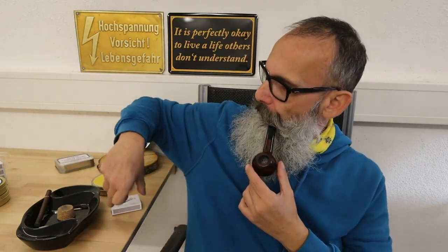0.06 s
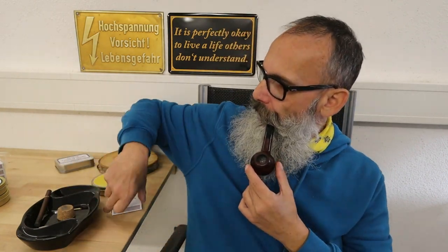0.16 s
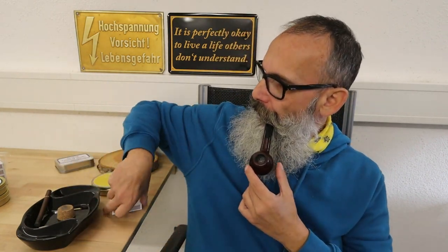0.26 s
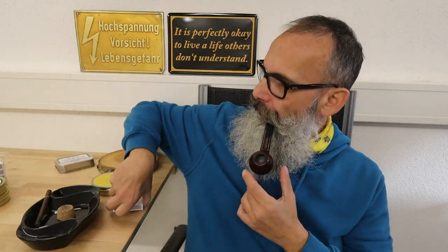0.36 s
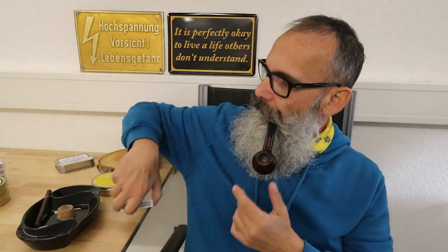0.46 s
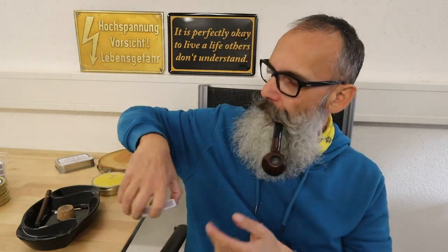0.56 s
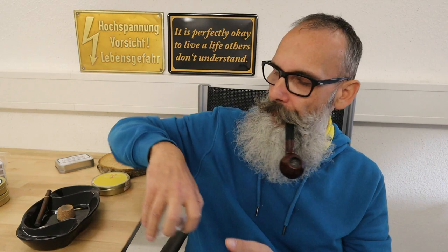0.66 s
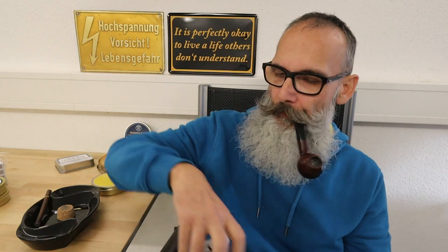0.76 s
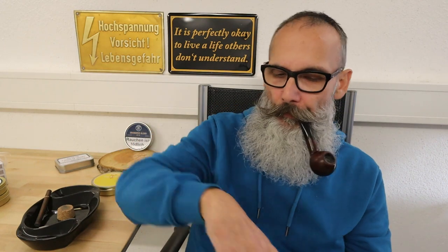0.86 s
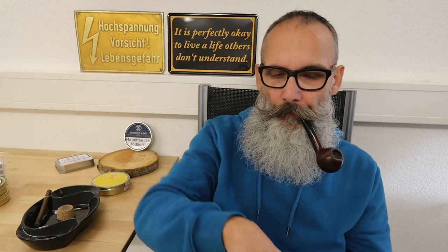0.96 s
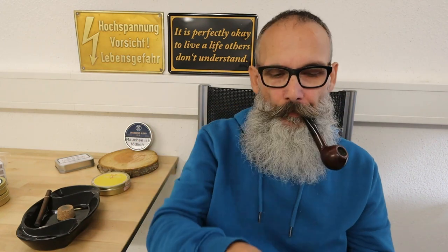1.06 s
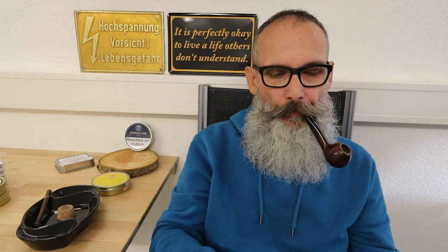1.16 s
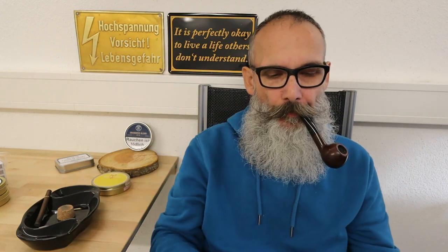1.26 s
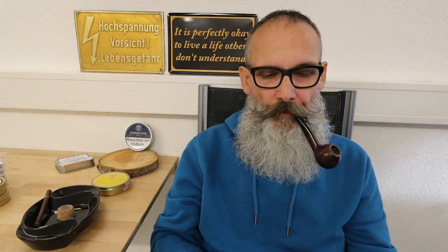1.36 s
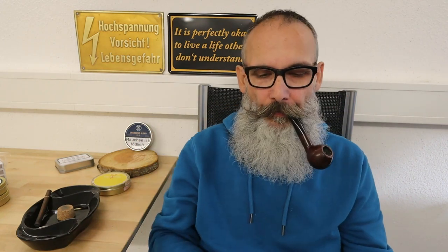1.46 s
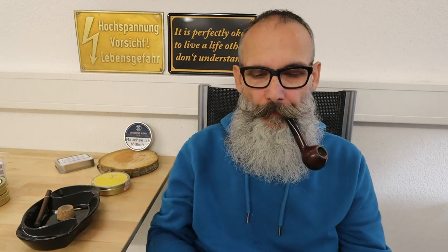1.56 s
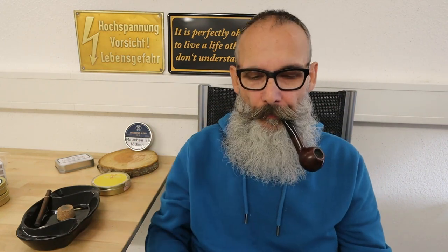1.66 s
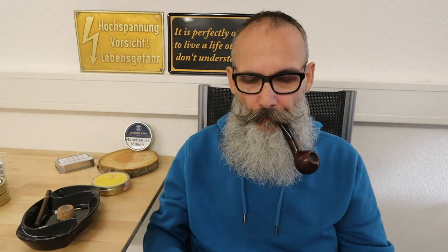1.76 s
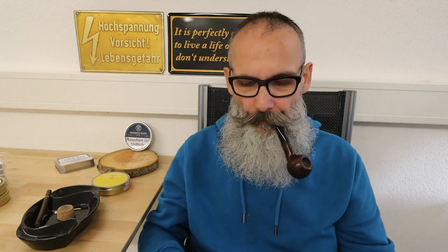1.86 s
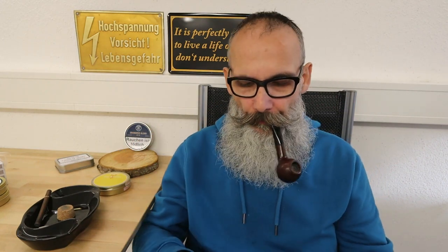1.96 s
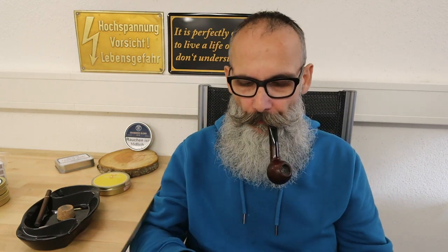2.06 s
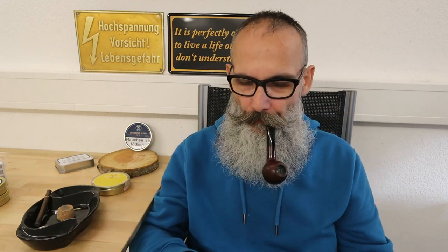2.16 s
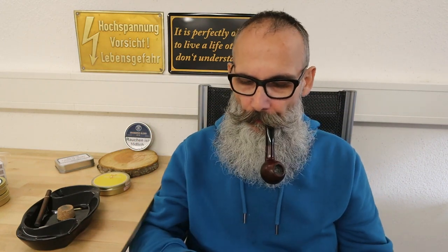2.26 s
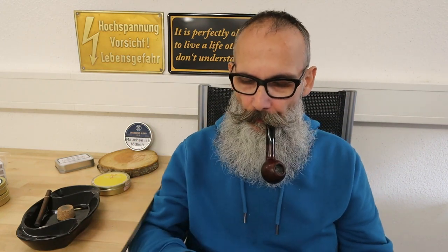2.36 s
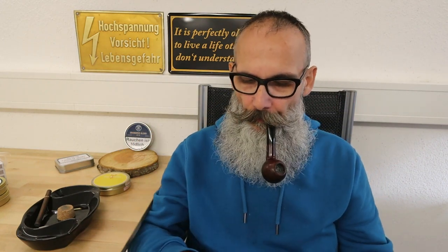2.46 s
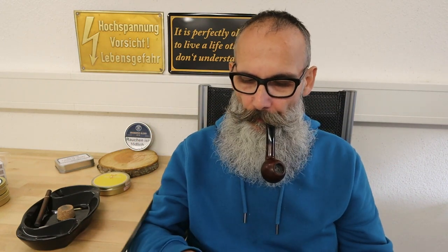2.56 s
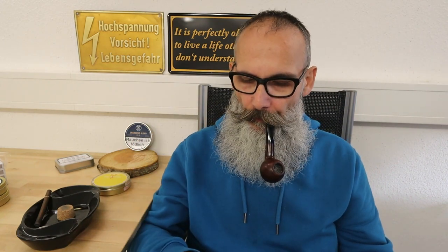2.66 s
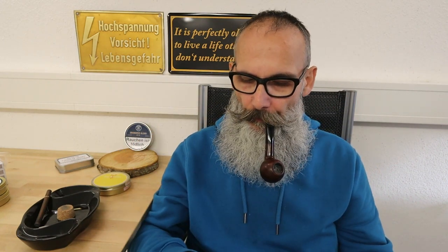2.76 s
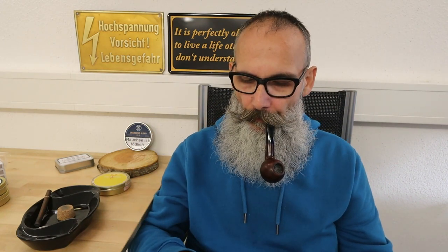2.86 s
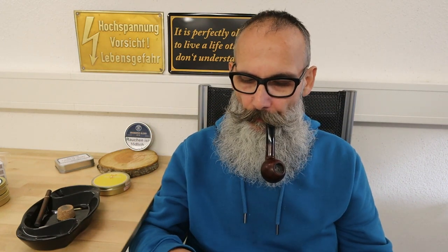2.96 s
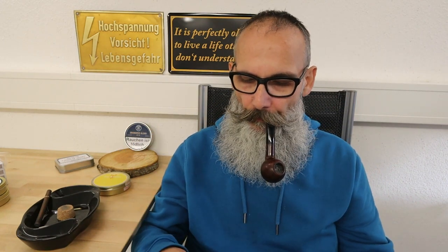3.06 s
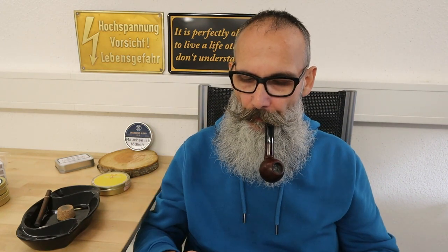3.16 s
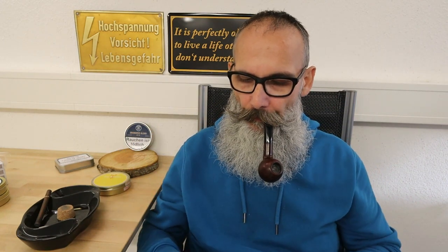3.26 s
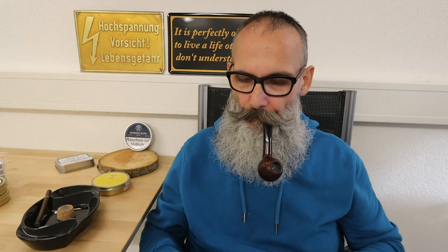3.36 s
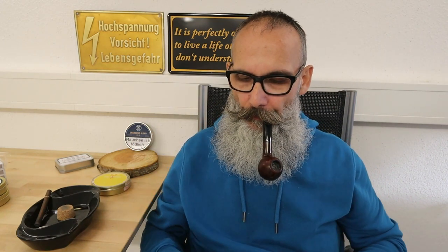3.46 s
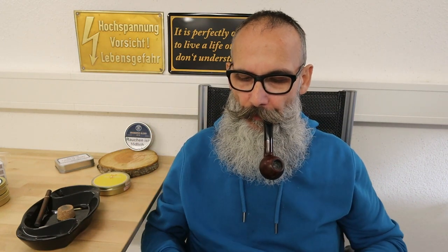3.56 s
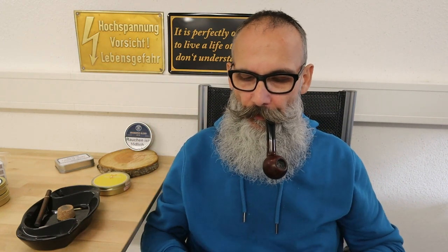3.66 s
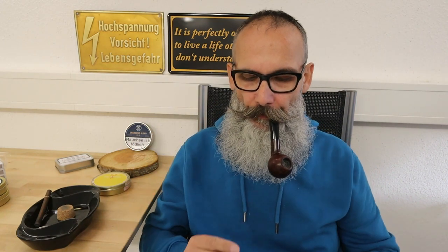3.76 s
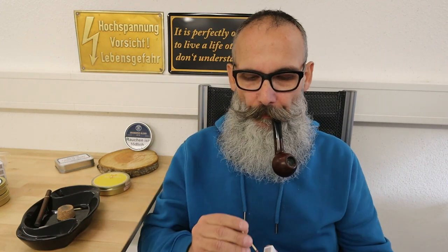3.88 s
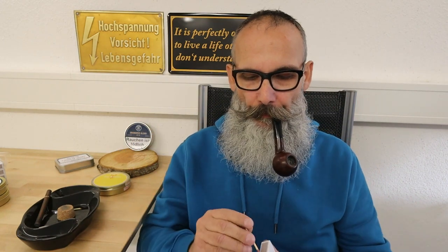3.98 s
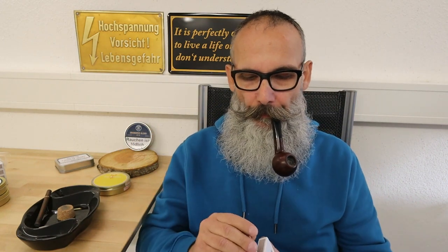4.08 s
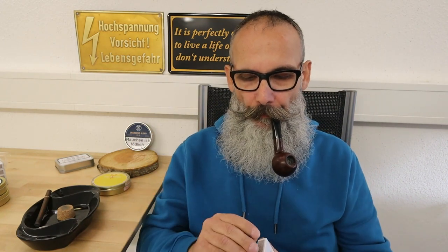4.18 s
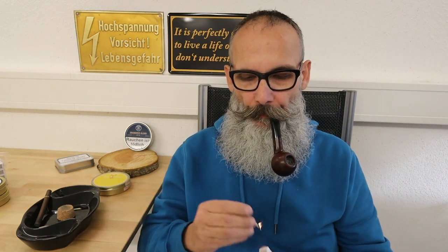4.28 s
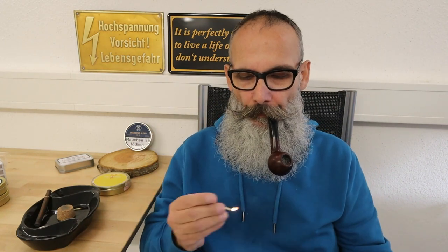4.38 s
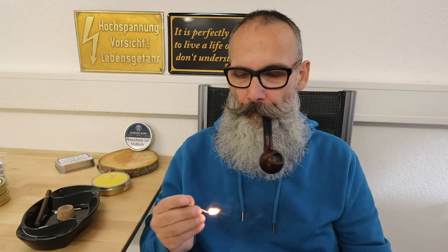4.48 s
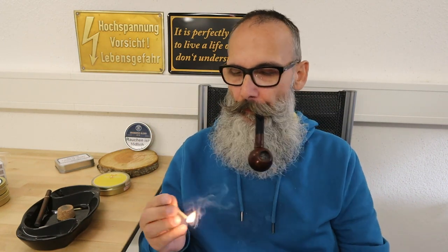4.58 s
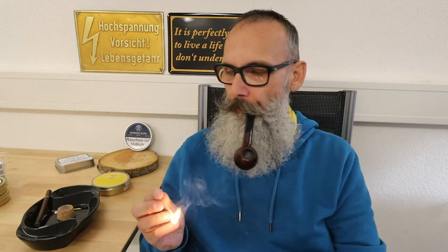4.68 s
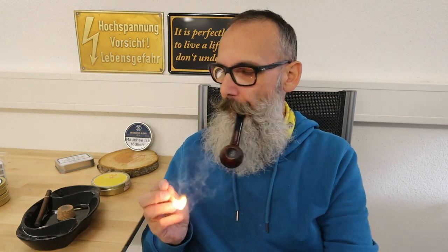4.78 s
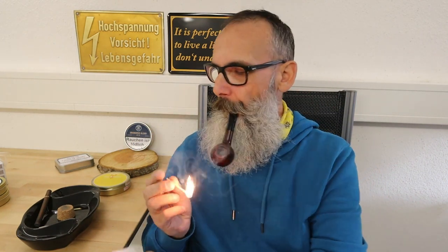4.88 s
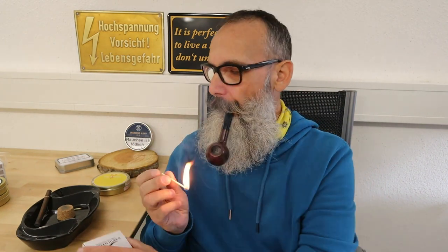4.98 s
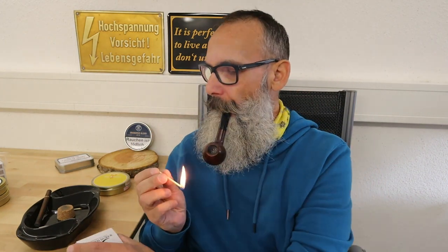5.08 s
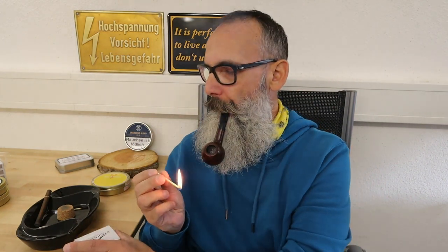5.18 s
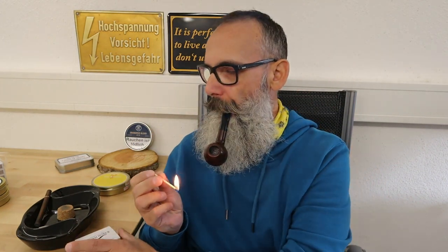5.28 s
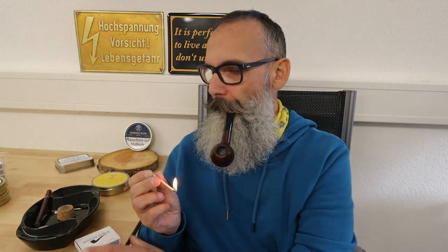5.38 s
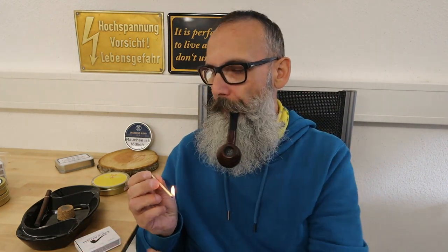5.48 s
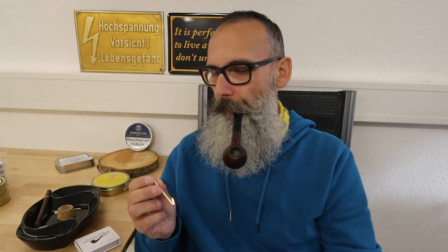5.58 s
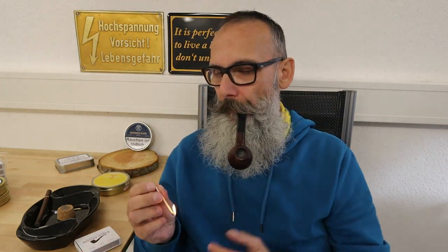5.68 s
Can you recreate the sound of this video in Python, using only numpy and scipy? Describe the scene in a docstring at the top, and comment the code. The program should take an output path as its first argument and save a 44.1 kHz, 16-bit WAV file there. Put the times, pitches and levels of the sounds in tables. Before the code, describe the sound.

A cardboard matchbox skids faintly on a desk during the first second. From about 1.1 to 1.7 seconds its tray slides open with dry scrapes and a click. Between 2.1 and 3.1 seconds fingers stir the wooden matches in a busy, clattering rattle, with a soft rustle of sleeve underneath. From about 3.2 to 3.9 seconds the tray is pushed shut with scrapes, crisp ticks, a dull bump and hollow taps. At 4.2 seconds the match head ticks lightly against the strip. Just before 4.4 seconds it scrapes and catches with a sharp, crackling burst, the loudest sound by far. A short fizz follows, with a faint hiss swelling and dying away by about 5.1 seconds. At 5.2 seconds the box is put back on the desk with a soft knock. The microphone is close, in a bare, echoing office with quiet, steady room noise.

```python
"""Striking a match at a desk

A matchbox is skidded on a desk and slid open; fingers stir the matches and push the tray shut. Cardboard
and cloth are filtered noise, matches swarms of tiny impacts, taps short filtered clicks, hollow notes damped sines.
The head judders on the strip, catches with a crackling burst and fizzes out as swelling, fading noise.
The box is put back on the desk. A bare, echoing office, one microphone close by."""
import sys
import numpy as np
from scipy import signal
from scipy.fft import rfft, irfft, next_fast_len
from scipy.io import wavfile
from scipy.ndimage import uniform_filter1d, map_coordinates

SR = 44100
rng = np.random.default_rng(int(sys.argv[2]) if len(sys.argv) > 2 else 0)


def materialize(psi):
    """Save the field psi as 16-bit PCM at rate SR to the path in sys.argv[1].

    A 1-D psi becomes a single channel; in a 2-D psi each row is a channel.
    """
    bounded = np.clip(np.atleast_2d(psi).T, -1, 1)
    quanta = np.round(bounded * 32767).astype(np.int16)
    wavfile.write(sys.argv[1], SR, quanta)


N = 252693
T = np.arange(N) / SR
SIZE = next_fast_len(N + SR)  # room for filtering the whole take
HZ = np.fft.rfftfreq(SIZE, 1 / SR)

# Colour of bare cardboard. Each row: frequency in Hz, relative level in dB.
CARD_COLOUR = [(200, -34.5), (500, -19), (850, -12), (1200, -5), (1750, -1.5), (2400, -0.5), (3200, -4),
               (5000, -8.5), (7000, -13), (10000, -19.5), (13500, -26), (15500, -28)]
# Colour of the shut box. Each row: frequency in Hz, relative level in dB.
SHUT_BOX_COLOUR = [(120, -35), (300, -6), (520, -13), (800, -5), (1250, 6), (1900, -2), (2800, -4.5),
                   (4500, -9), (7000, -19.5), (15500, -38)]


def amp(db):
    """Decibels to gain."""
    return 10 ** (np.asarray(db) / 20)


def unit(x):
    """x at rms 1."""
    return x / np.sqrt(np.mean(x ** 2) + 1e-20)


def along(points, hz):
    """(Hz, value) points read on a log frequency axis."""
    f, v = np.transpose(points)
    return np.interp(np.log(hz + 1), np.log(f + 1), v)


def add(track, s, sound):
    """Mix a sound into the track at time s, in seconds."""
    start = max(round(s * SR), 0)
    track[start:start + len(sound)] += sound[:max(N - start, 0)]


def through(x, h):
    """x sounding through an impulse response."""
    return signal.fftconvolve(x, h)[:len(x)]


def body(spectrum, tilt_db=0, vary_db=0, size=2048, count=40):
    """Minimum-phase response of energy 1; tilt is dB per octave above 1 kHz, and each call ripples anew."""
    hz = np.fft.rfftfreq(size, 1 / SR)
    ripple = np.interp(np.sqrt(hz / hz[-1]), np.linspace(0, 1, count), rng.standard_normal(count))
    db = along(spectrum, hz) + tilt_db * np.log2(np.maximum(hz, 1000)) + vary_db * ripple
    floored_db = np.maximum(db, db.max() - 80)
    # folding the cepstrum forward in time makes the response causal
    cepstrum = irfft(np.log(amp(floored_db)))
    cepstrum[1:size // 2] *= 2
    cepstrum[size // 2 + 1:] = 0
    h = irfft(np.exp(rfft(cepstrum)))
    return h / np.linalg.norm(h)


def push(h):
    """A single clean impulse of peak 1 through the response h."""
    return h / np.abs(h).max()


def ring(hz, t60, length):
    """One damped mode that falls 60 dB in t60 seconds."""
    t = np.arange(round(length * SR)) / SR
    return np.sin(2 * np.pi * hz * t) * np.exp(-np.log(1000) * t / t60)


def grit(count, rate, scatter_db):
    """Random tiny impacts of either sign and uneven size, about rate a second, at rms 1."""
    hit = rng.random(count) < rate / SR
    sign = np.sign(rng.standard_normal(count))
    height = amp(scatter_db * np.clip(rng.standard_normal(count), -2, 2))
    return unit(hit * sign * height)


def flutter(rate, depth_db):
    """A smooth random gain through rate new values a second."""
    values = rng.standard_normal(int(N * rate / SR) + 4)
    return amp(depth_db * map_coordinates(values, [T * rate]))


def swell(middle, half):
    """A smooth bell-shaped rise and fall of height 1."""
    return np.exp(-((T - middle) / half) ** 2)


def room_tone(air_db=-54.5):
    """The steady low rumble and hiss of the room, as noise shaped in frequency."""
    # Colour of the room's air. Each row: frequency in Hz, relative level in dB.
    air_colour = [(25, -10), (40, -6.5), (65, 1.5), (110, -2), (250, -5), (600, -9.5), (1100, -11.5),
                  (1700, -13.5), (2600, -19.5), (4500, -18), (8000, -19.5), (13000, -24.5), (15500, -25.5)]
    spectrum = rfft(rng.standard_normal(SIZE)) * amp(along(air_colour, HZ))
    return amp(air_db) * unit(irfft(spectrum, SIZE)[:N])


def office(x, delay=0.00089, build=0.0039, size=4096):
    """A diffuse echo, its decay set band by band; each block of the sound gets a fresh random pattern."""
    # Decay of the echo off the walls. Each row: frequency in Hz, time to fall 60 dB in seconds.
    walls = [(150, 0.6), (500, 0.82), (1200, 0.68), (4000, 0.69), (8000, 0.7), (15000, 0.42)]
    out = np.zeros(N)
    hz, t, _ = signal.stft(np.zeros(SR * 2 // 3), SR, nperseg=256)
    decay = np.exp(-np.log(1000) * t / along(walls, hz)[:, None])
    fade = decay * (1 - np.exp(-np.maximum(t - delay, 0) / build))
    for start in range(0, N, size):
        z = rng.standard_normal(fade.shape) + 1j * rng.standard_normal(fade.shape)
        tail = signal.istft(z * fade, SR, nperseg=256)[1]
        add(out, start / SR, signal.fftconvolve(x[start:start + size], tail / np.linalg.norm(tail)))
    return out


def desk(waver_db=2):
    """The desk top hums briefly and unevenly, as damped modes, when the box is taken and put back."""
    # Low ringing of the desk. Each row: start in seconds, pitch in Hz, relative level in dB,
    # time to fall 60 dB in seconds.
    booms = [(0, 155.9, -43.5, 1.65), (5.237, 141.2, -48.5, 1.9)]
    out = np.zeros(N)
    for s, hz, db, t60 in booms:
        add(out, s, amp(db) * ring(hz, t60, 1))
    return out * flutter(rate=32, depth_db=waver_db)


def sleeve(cloth_db=-6, resting_db=-57):
    """The soft, low rustle of a sweatshirt: filtered noise that swells and fades with each reach."""
    # Arm movements. Each row: fastest moment in seconds, half length in seconds, relative level in dB.
    reaches = [(0.7, 1, -51), (1.977, 0.23, -42), (2.702, 0.61, -44), (5.15, 0.47, -49.5)]
    # Colour of the cloth. Each row: frequency in Hz, relative level in dB.
    cloth_colour = [(25, -29), (70, 2), (150, -5), (400, -6.5), (600, -9), (950, -4), (1500, -12.5),
                    (6000, -41)]
    reach_power = sum((amp(db) * swell(s, half)) ** 2 for s, half, db in reaches)
    motion = np.sqrt(amp(resting_db) ** 2 + reach_power)
    rustle = through(rng.standard_normal(N), body(cloth_colour, size=8192))
    return amp(cloth_db) * motion * unit(flutter(rate=17, depth_db=1.0) * rustle)


def gripping(attack=0.048, release=0.066, resting_db=-56.5):
    """Finger pressure: each grip builds, holds and lets go, over the light touch of just holding the box."""
    # Fingers working on the box. Each row: start in seconds, length in seconds, relative level in dB.
    grips = [(0.306, 0.57, -48.5), (0.75, 1.1, -48), (2.13, 0.27, -43), (2.502, 0.53, -46.5),
             (3.268, 0.29, -41.5), (3.797, 0.16, -52), (5.24, 0.15, -47.5)]
    pressure = np.full(N, amp(resting_db))
    for s, length, db in grips:
        t = np.maximum(T - s, 0)
        held = (1 - np.exp(-t / attack)) * np.exp(-np.maximum(t - length, 0) / release)
        pressure = np.maximum(pressure, amp(db) * held)
    return pressure


def sliding(brush_db=-5, stop=0.003):
    """Cardboard fibres catch and slip in uneven clumps; fingers brush the box all along."""
    # Tray sliding in its cover. Each row: start in seconds, length in seconds, relative level in dB,
    # treble tilt in dB per octave, time constant of the swell in seconds.
    slides = [(1.16, .11, -40.5, -3.5, 0.028), (1.36, 0.13, -39.5, -3, 0.036),
              (1.456, 0.084, -30, .5, 0.0061), (1.66, 0.037, -39.5, -1, 0.0077),
              (3.1, 0.029, -45, 1.5, .01), (3.205, 0.071, -46, 2, 0.017), (3.268, 0.013, -38, 2.5, 0.0064),
              (3.29, 0.11, -42.5, 1, 0.023), (3.37, .013, -35.5, 1, .003), (3.41, 0.05, -36, 0.5, 0.012),
              (3.52, 0.074, -47.5, -3, 0.0088)]
    # Tray pushed home, rubbing inside the shut box. Each row: the same columns as the slides.
    pushes = [(3.79, 0.013, -40, 1, 0.007), (3.835, .075, -35, 0.95, 0.023), (3.93, 0.041, -44, 0, .02)]
    # Box skidding on the desk. Each row: the same columns as the slides.
    drags = [(.247, 0.056, -48, 0.5, 0.0044), (.335, 0.045, -45.5, -2, 0.012), (.47, 0.037, -50, 0, 0.0079),
             (.66, 0.033, -49.5, -0.5, .008), (.94, 0.11, -51, -2, 0.047), (5.23, 0.026, -43, -0.5, 0.0045)]
    # Colour of the desk top under the box. Each row: frequency in Hz, relative level in dB.
    desktop_colour = [(200, -15), (900, -5.5), (1400, 3.5), (1650, -5), (1900, 7), (2300, -6.5),
                      (3200, -4.5), (3650, 0), (4200, -12.5), (9000, -14), (15500, -35)]
    brush = through(grit(N, rate=1800, scatter_db=3.5), body(CARD_COLOUR, tilt_db=-.5))
    brush = flutter(rate=14, depth_db=3.0) * brush
    out = amp(brush_db) * gripping() * unit(brush)
    t = np.arange(SR // 2) / SR
    for strokes, colour in (slides, CARD_COLOUR), (pushes, SHUT_BOX_COLOUR), (drags, desktop_colour):
        for s, length, db, tilt_db, rise in strokes:
            speed = (1 - np.exp(-t / rise)) * np.exp(-np.maximum(t - length, 0) / stop)
            clumps = flutter(rate=129.5, depth_db=2.5)[:len(t)]
            fibres = clumps * grit(len(t), rate=5000, scatter_db=1.5)
            add(out, s, amp(db) * speed * through(fibres, body(colour, tilt_db, vary_db=1.55)))
    return out


def jostles(per_s=22, scatter_db=1.5, spread=0.0017):
    """Faint chance collisions of single matches, one at random in each slot, as rows like the tumbles."""
    # Spells of jostling. Each row: start in seconds, length in seconds, middle relative level in dB.
    spells = [(0.649, 0.45, -43), (2.152, 0.3, -31), (2.6, 0.3, -32), (2.899, 0.2, -35.5)]
    rows = []
    for s, length, db in spells:
        for slot in np.arange(0, length, 1 / per_s):
            late, size = rng.random(2)
            rows.append((s + slot + late / per_s, db + scatter_db * (2 * size - 1), spread))
    return rows


def rattling(tumble_db=-2.5, tilt_db=-0.14, snap_db=2.5):
    """Each tumble is a swarm of stick collisions that builds up to one hard snap and thins out again."""
    # Matches tumbling in the tray. Each row: height of the swarm in seconds, relative level in dB,
    # spread in seconds.
    tumbles = [(0.785, -36, 0.011), (1.123, -37, 0.0025), (1.224, -33.5, 0.0056), (1.248, -28, 0.0018),
               (1.264, -27, .004), (1.419, -34, 0.0023), (1.436, -34, .003), (1.524, -21.5, 0.0023),
               (1.705, -26.5, 0.0045), (2.139, -21.5, 0.006), (2.153, -14.5, .005), (2.222, -23.5, 0.011),
               (2.255, -23, .012), (2.319, -16, .0044), (2.335, -20, 0.0044), (2.357, -14, .006),
               (2.372, -23, 0.0048), (2.545, -32, 0.013), (2.563, -24.5, .008), (2.62, -25.5, 0.0066),
               (2.64, -20, 0.0031), (2.667, -16.5, 0.0065), (2.717, -17.5, .0026), (2.804, -22, 0.0037),
               (2.821, -19.5, 0.0068), (2.872, -23, 0.0053), (2.955, -31, 0.0059), (3.048, -33.5, 0.0043),
               (3.124, -34, .006)]
    # Colour of the wooden sticks. Each row: frequency in Hz, relative level in dB.
    stick_colour = [(150, -37.5), (330, -15.5), (520, -13.5), (700, -15.5), (950, -9), (1350, -7),
                    (1800, 1.5), (2600, -8.5), (3600, -9), (5000, -8.5), (6500, -16), (9500, -20),
                    (11000, -30.5), (15500, -31.5)]
    hard_db, brighter_per_db = -22, 0.065  # dB per octave brighter for each dB over hard_db
    tray_opens, cover_tilt_db = 1.45, -1.5  # the cover muffles the matches until then (s, dB per octave)
    out = np.zeros(N)
    t = np.arange(-SR // 10, SR // 10) / SR
    for s, db, spread in [*tumbles, *jostles()]:
        own_tilt_db = brighter_per_db * (db - hard_db) + cover_tilt_db * (s < tray_opens)
        wood = body(stick_colour, tilt_db + own_tilt_db, vary_db=1.5)
        shape = np.where(t < 0, np.exp(-(t / spread) ** 2), np.exp(-np.abs(t) / spread))
        swarm = through(shape * grit(len(t), rate=5000, scatter_db=3), wood)
        add(out, s + t[0], amp(db + tumble_db) * swarm)
        add(out, s, amp(db + snap_db) * push(wood))
    return out


def click(h, crush, fibres_db=-13, size=4096):
    """A contact of peak 1: one push, then fibres crackling as they give way."""
    crackle = amp(fibres_db) * grit(size, rate=13000, scatter_db=2) * np.exp(-np.arange(size) / SR / crush)
    crackle[0] = 1
    return push(through(crackle, h))


def knocking(tick_db=-1, tap_db=-2):
    """Crackling ticks of the tray and taps on the shut box, dull bumps, and damped notes of the hollow box."""
    # Sharp ticks of the tray's edge. Each row: start in seconds, relative peak in dB,
    # treble tilt in dB per octave.
    ticks = [(1.668, -15.5, -2.5), (3.325, -18, -2), (3.337, -15.5, -0.5), (3.343, -13, -3),
             (3.373, -22, -1), (3.521, -17.5, -2)]
    # Taps on the shut box. Each row: the same columns as the ticks.
    taps = [(3.808, -14.5, 2), (3.868, -13, 1.5), (3.878, -18, -0.5), (3.89, -18, 1), (4.19, -19, 1.5),
            (4.211, -23, 0.5), (4.853, -22, 0), (5.228, -28.5, 2.5), (5.24, -26, -1.5), (5.361, -34, 0)]
    # Dull bumps of hand and box. Each row: start in seconds, peak in dB.
    bumps = [(1.398, -25), (1.704, -22), (3.684, -16.5), (3.807, -27), (3.813, -24), (5.233, -26.5)]
    # Colour of the bumps. Each row: frequency in Hz, relative level in dB.
    thud_colour = [(40, -15), (200, -0.5), (600, -1.5), (1300, -1.5), (3000, -14), (6000, -36),
                   (12000, -31)]
    # Hollow box sounding under a press. Each row: start in seconds, pitch in Hz, level in dB,
    # time to fall 60 dB in seconds.
    hollow = [(1.121, 1080, -34, .03), (3.808, 501, -28, 0.055), (3.806, 333, -40, .035),
              (3.89, 1300, -25, 0.027), (3.912, 420, -39, 0.037), (5.238, 420, -41.5, 0.11)]
    out = np.zeros(N)
    for s, db, tilt_db in ticks:
        edge = body(CARD_COLOUR, tilt_db, vary_db=1)
        add(out, s, amp(db + tick_db) * click(edge, crush=0.0023, fibres_db=-12))
    for s, db, tilt_db in taps:
        box = body(SHUT_BOX_COLOUR, tilt_db, vary_db=0.5)
        add(out, s, amp(db + tap_db) * click(box, crush=0.0046, fibres_db=-1.0))
    for s, db in bumps:
        add(out, s, amp(db) * push(body(thud_colour)))
    for s, hz, db, t60 in hollow:
        add(out, s, amp(db) * ring(hz, t60, .1))
    return out


def juddering(rise=0.0018, damping=0.0023, unsteady=0.081):
    """The head sticks and slips unevenly near the pitch of the box; the gripping hand damps it at once."""
    # Match head juddering on the strip. Each row: start in seconds, length in seconds,
    # middle pitch in Hz, relative level in dB.
    judders = [(4.190, 0.0082, 1273, -24.5), (4.2365, 0.0022, 1250, -27), (4.3865, 0.0038, 1220, -10)]
    out = np.zeros(N)
    t = np.arange(SR // 20) / SR
    for s, length, hz, db in judders:
        grip = (1 - np.exp(-t / rise)) * np.exp(-np.maximum(t - length, 0) / damping)
        wander = unit(uniform_filter1d(rng.standard_normal(len(t)), size=40))
        pitch = hz * (1 + unsteady * wander)
        add(out, s, amp(db) * grip * np.sin(2 * np.pi * np.cumsum(pitch) / SR))
    return out


def striking(touch=4.357, bite=4.3675, leave=4.3905, drag_db=-22, scrape_db=-13.5, grow_db=8, pop_db=-1.0):
    """The head drags, bites into the strip and crackles ever harder until it flies off the edge."""
    # Largest specks of the head going off. Each row: start in seconds, relative peak in dB.
    pops = [(4.3673, -3), (4.3733, 3), (4.3775, 4.5), (4.3815, 2), (4.387, 5)]
    # Colour of the striking strip. Each row: frequency in Hz, relative level in dB.
    strip_colour = [(60, -51), (200, -24), (500, -14), (900, -3), (1300, 2.5), (1600, -8.5), (2500, -7),
                    (3600, -5.5), (5000, -1.5), (6000, -5), (8700, -4.5), (10200, -13), (13000, -10.5),
                    (15500, -20)]
    release = np.exp(-np.maximum(T - leave, 0) / 0.0021)
    progress = np.clip((T - bite) / (leave - bite), 0, 1)
    contact = np.clip((T - touch) / 0.0053, 0, 1) * release
    drag = amp(drag_db) * contact * grit(N, rate=7000, scatter_db=-0.5)
    # the grit of the strip grabs the head in jerks
    jerks = flutter(rate=700, depth_db=2) * grit(N, rate=9000, scatter_db=3)
    scrape = amp(scrape_db + grow_db * (progress - 0.5)) * (T > bite) * release * jerks
    out = through(drag, body(CARD_COLOUR, tilt_db=-3)) + through(scrape, body(strip_colour))
    for s, db in pops:
        add(out, s, amp(db + pop_db) * push(body(strip_colour, tilt_db=-2.0, vary_db=2.5)))
    return out


def burning(spit_db=-13, lit=4.42, spent=5.12):
    """Gas fizzes from the head, with an occasional sharper spit, until only the silent flame is left."""
    # Colour of the fizzing gas. Each row: frequency in Hz, relative level in dB.
    fizz_colour = [(200, -11), (500, -7), (1000, 0.5), (1700, -2.5), (2700, -2), (4000, -5.5), (8500, -7),
                   (10500, -17.5), (15500, -19)]
    alight = np.clip((T - lit) / 0.21, 0, 1) * np.exp(-np.maximum(T - spent, 0) / .05)
    # the first rush of gas dies away at 136 dB a second
    flare = amp(-18.5 - 136 * np.maximum(T - lit, 0))
    # the rest of the head burns in one slow swell
    afterburn = amp(-44.5) * swell(middle=4.9, half=0.23)
    gas = np.hypot(flare, afterburn)
    fizz = flutter(rate=43, depth_db=1.15) * through(grit(N, rate=3000, scatter_db=2.5), body(fizz_colour))
    spits = amp(spit_db) * through(grit(N, rate=46, scatter_db=2), body(fizz_colour))
    return alight * gas * (fizz + spits)


def scene(handling_wet_db=-3.5, knock_wet_db=-5, judder_wet_db=-11, strike_wet_db=-7.5):
    """The box is handled low by the desk, so more of it arrives as echo than of the strike."""
    sources = [(sliding() + rattling(), handling_wet_db), (knocking(), knock_wet_db),
               (juddering(), judder_wet_db), (striking() + burning(), strike_wet_db)]
    direct = sum(sound for sound, _ in sources)
    echo = office(sum(amp(wet_db) * sound for sound, wet_db in sources))
    return (direct + echo + desk() + sleeve() + room_tone())[None]


def record(dry, top_hz=15850):
    """The loudest peaks round off towards full scale, then everything from top_hz up is cut."""
    rounded = dry / (1 + np.abs(dry) ** 8) ** (1 / 8)
    return irfft(rfft(rounded, SIZE) * (HZ < top_hz), SIZE)[:, :N]


dry = scene()
out = record(dry)
materialize(out)
```